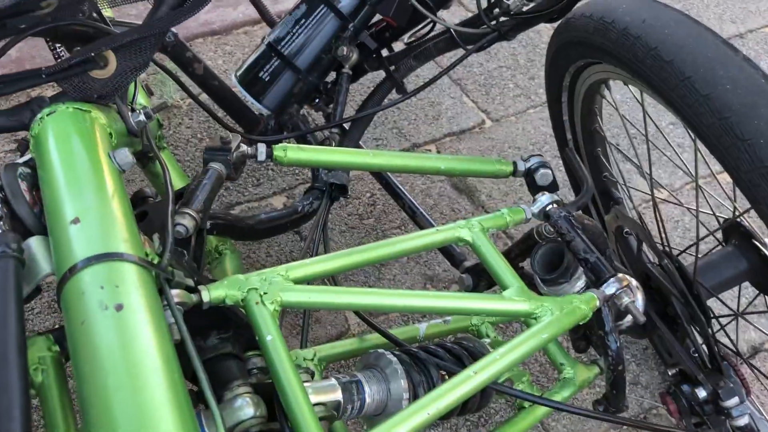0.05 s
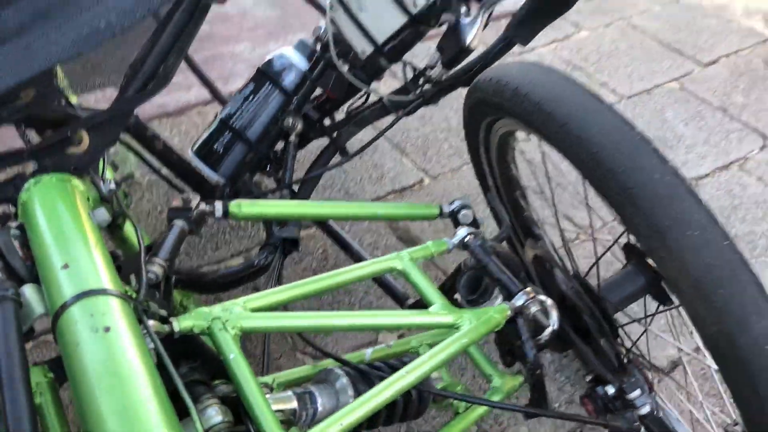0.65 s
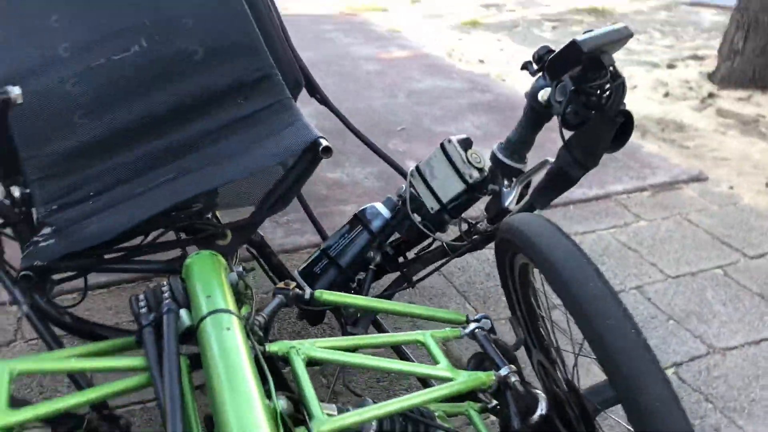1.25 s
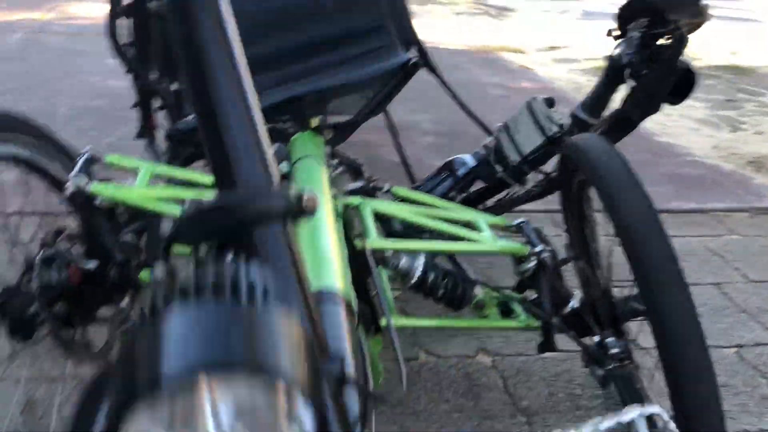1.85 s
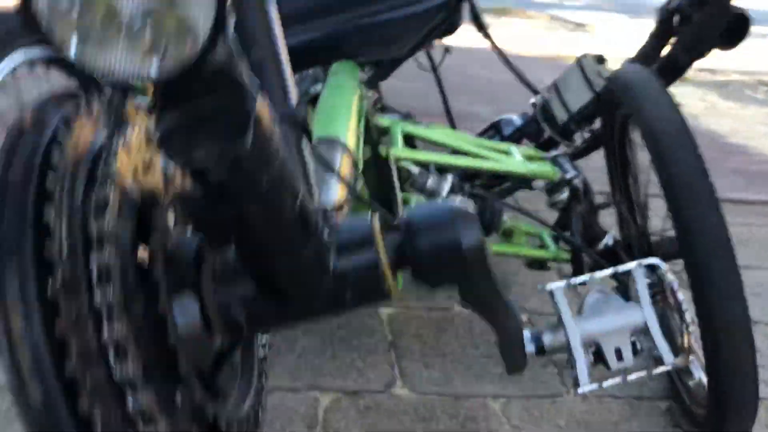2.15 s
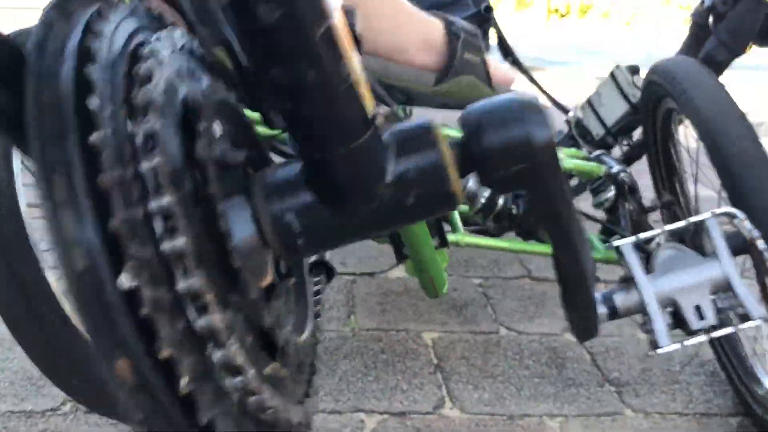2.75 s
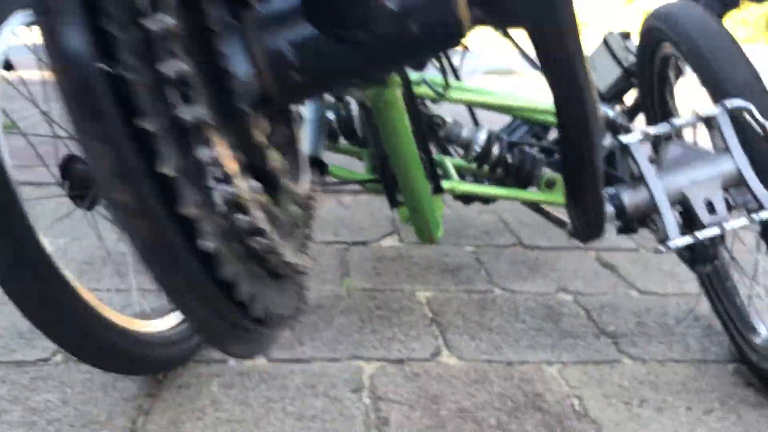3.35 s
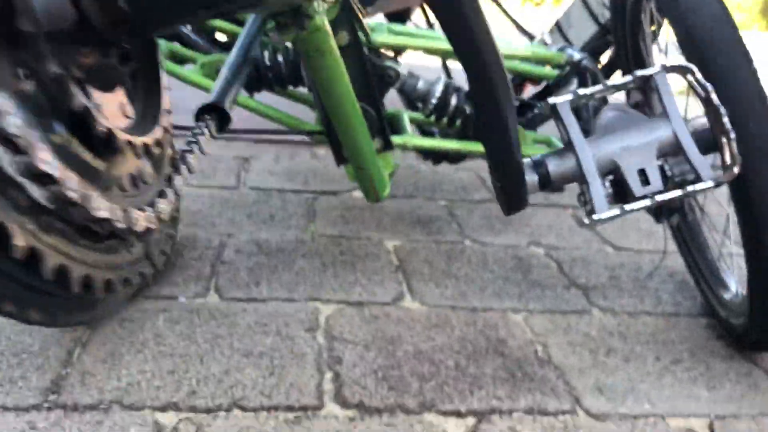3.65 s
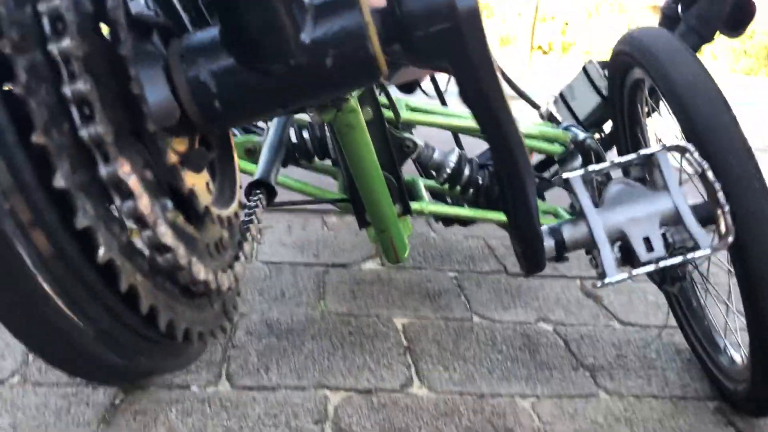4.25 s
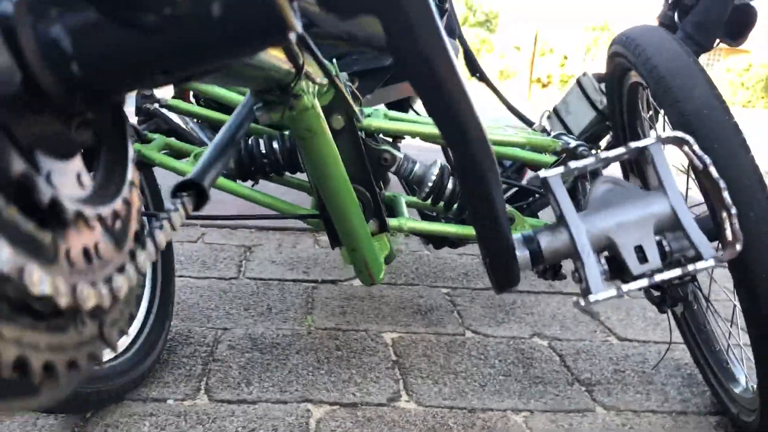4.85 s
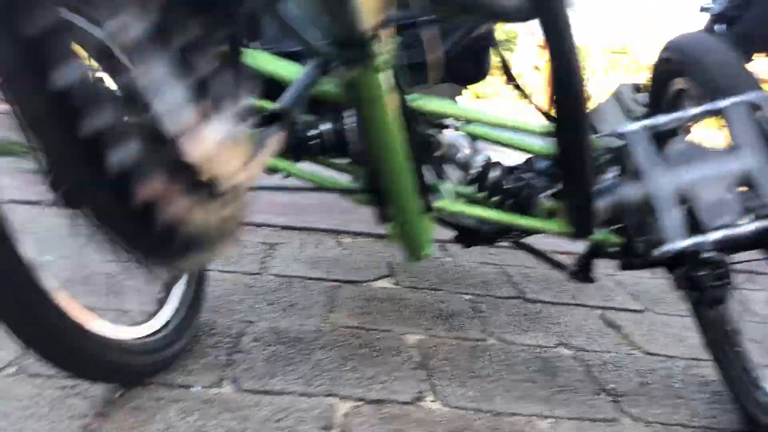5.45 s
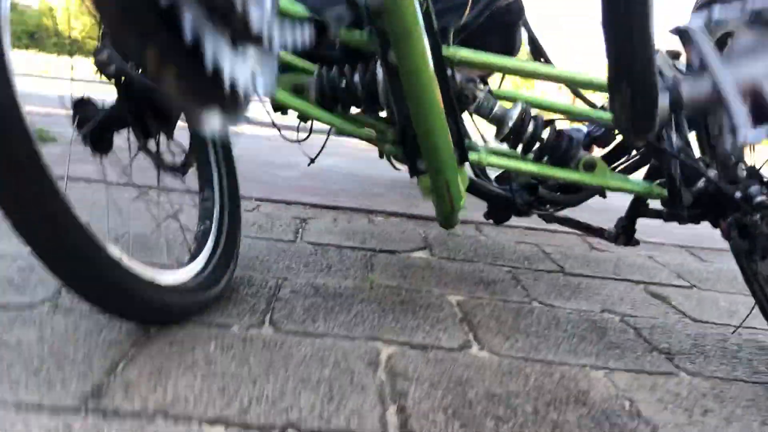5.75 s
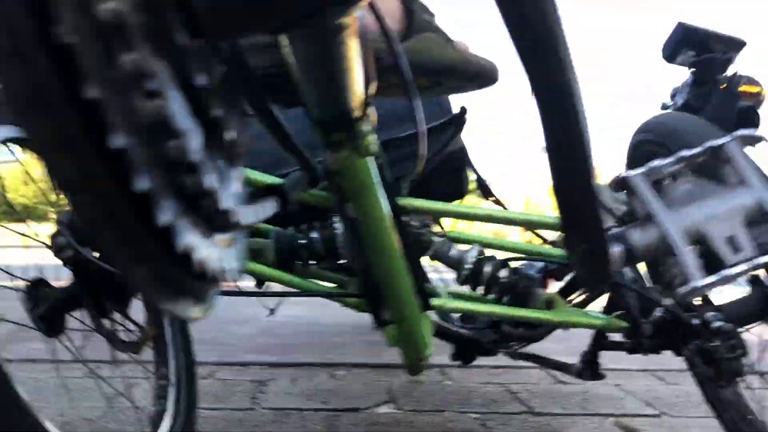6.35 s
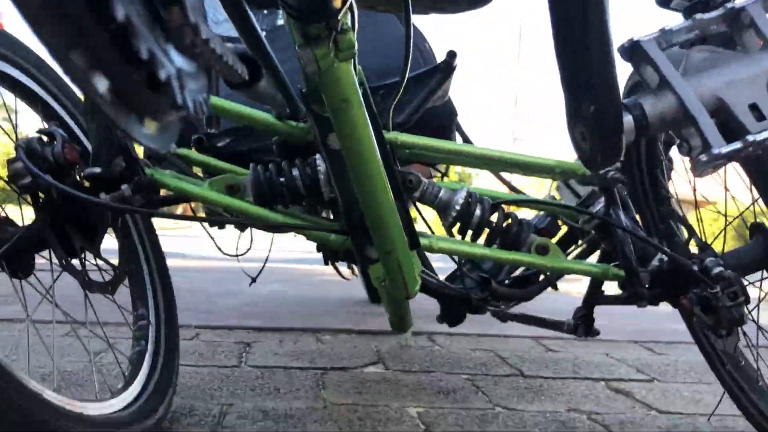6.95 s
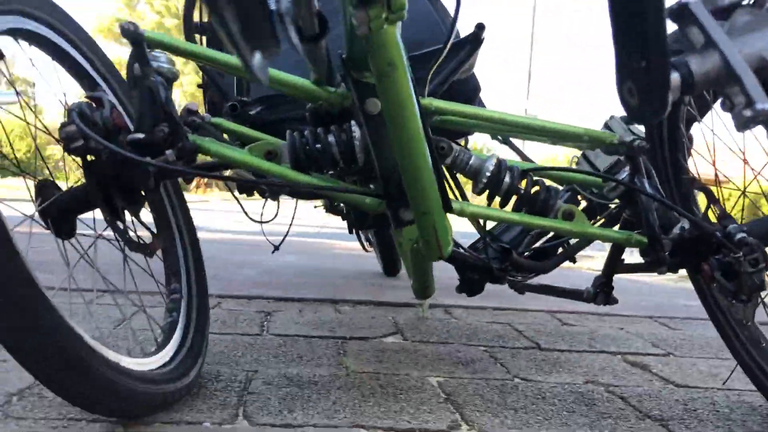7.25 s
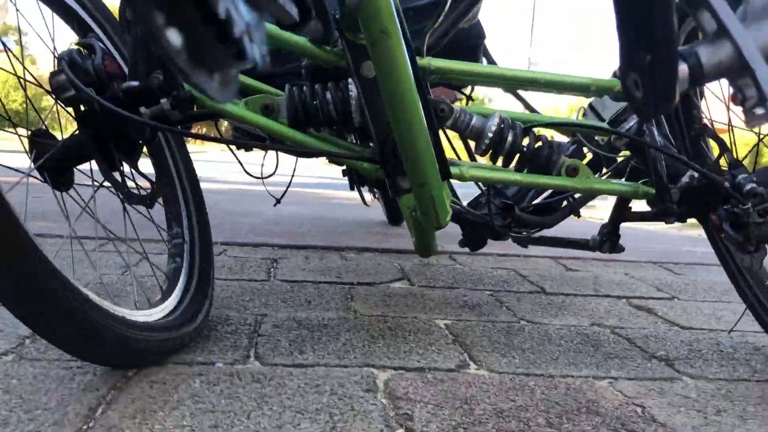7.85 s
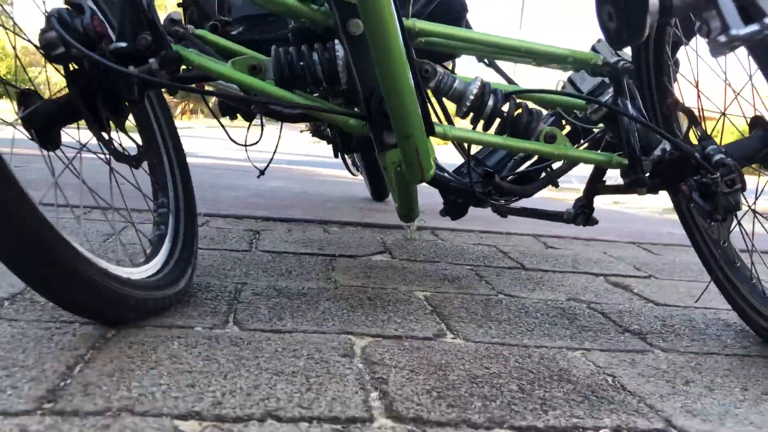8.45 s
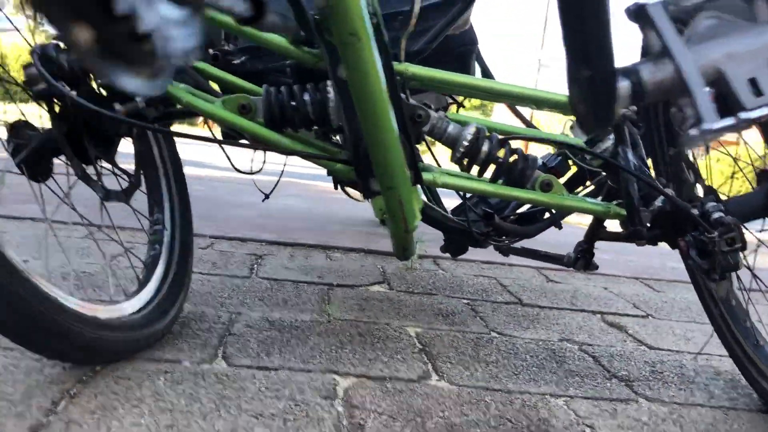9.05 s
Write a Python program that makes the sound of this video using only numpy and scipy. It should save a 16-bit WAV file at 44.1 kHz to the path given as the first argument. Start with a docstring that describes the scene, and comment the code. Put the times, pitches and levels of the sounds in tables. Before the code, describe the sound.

A faint low rumble of far traffic and a soft hiss run throughout, in a yard with little echo. Close by, a recumbent trike gives a few light ticks and a knock, then at about 0.8 seconds a metal part snaps sharply with a short, bright ring, the loudest sound. From 0.7 to 2.3 seconds shoes scuff lightly on gritty paving and clothes rustle softly. Between 2 and 2.7 seconds the frame knocks and thumps as someone settles into the seat, strongest near 2.3 and 2.7 seconds. From about 3 seconds the suspension is rocked: very short, dry creaks and tiny high squeaks come unevenly, mixed with light knocks, clicks of loose parts and faint ticking of chain and cables. The creaks stand out around 3.8 to 4.9 seconds and near 7.1. A dull knock comes near 7.8 seconds, and small ticks and squeaks continue until about 9 seconds.

```python
"""Far traffic rumbles faintly in a yard; a few ticks and knocks, then a metal part snaps and rings.
Soles scuff gritty paving as someone steps up to a recumbent trike and settles into the seat.
Each impact excites damped modes, so the frame knocks and thumps and its loose parts tick.
Then the suspension is rocked, and stick-slip friction in its dry joints makes short creaks
(runs of uneven slips) and squeaks (slips that lock into a pitch)."""
import sys
import numpy as np
from scipy import signal
from scipy.io import wavfile
from scipy.ndimage import uniform_filter1d

SR = 44100
rng = np.random.default_rng(int(sys.argv[2]) if len(sys.argv) > 2 else 0)


def store_wav(level_fs):
    """Save 16-bit WAV to argv[1]."""
    pcm = np.round(np.clip(np.atleast_2d(level_fs), -1, 1) * 32767)
    wavfile.write(sys.argv[1], SR, pcm.T.astype(np.int16))


N = 405940
BAND_LIMIT_HZ = 16200
HZ = np.fft.rfftfreq(2048, 1 / SR) + 1  # frequency axis of every spectrum


def amp(db):
    """Amplitude ratio of a level in decibels."""
    return 10 ** (np.asarray(db) / 20)


def unit_rms(x):
    """Normalisation to unit mean power."""
    return x / np.sqrt(np.mean(x ** 2) + 1e-20)


def seconds(length):
    """Uniform sampling times over a duration."""
    return np.arange(max(int(length * SR), 8)) / SR


def spectrum(points):
    """Spectral envelope in dB, interpolated over log frequency."""
    hz, db = np.transpose(points)
    return np.interp(np.log(HZ), np.log(hz), db)


def resonances(modes):
    """Resonance curves: one Lorentzian peak in dB for each mode."""
    return sum(db / (1 + (2 * (HZ - hz) / width) ** 2) for hz, width, db in modes)


def colour(x, db):
    """Minimum-phase filtering: a causal body rings after a blow, never before."""
    log_gain = np.log(amp(np.maximum(db - db.max(), -90)))
    log_response = np.conj(signal.hilbert(np.r_[log_gain, log_gain[-2:0:-1]]))
    return signal.fftconvolve(x, np.fft.ifft(np.exp(log_response)).real)


def levelled(x, db, span):
    """Equivalent level: x gets the energy of a steady sound of db lasting span seconds."""
    return amp(db) * x * np.sqrt(span * SR / (np.sum(x ** 2) + 1e-20))


def add(mix, start, sound):
    """Superposition: a sound joins the mix at a time in seconds."""
    part = mix[max(round(start * SR), 0):][:len(sound)]
    part += sound[:len(part)]


def mode(hz, t60, t, phase_turns=0):
    """Free vibration of a damped oscillator."""
    return np.exp(-np.log(1000) * t / t60) * np.sin(2 * np.pi * (hz * t + phase_turns))


def burst(t60, rise=.00028):
    """Modal overlap: many small modes merge into noise that spreads through a part and decays."""
    t = seconds(t60)
    return rng.standard_normal(len(t)) * (1 - np.exp(-t / rise)) * np.exp(-np.log(1000) * t / t60)


def grains(count, per_s, spread_db):
    """A Poisson process of tiny contacts, unequal in size."""
    occurs = rng.random(count) < per_s / SR
    size = np.minimum(rng.exponential(1, count), 4)
    return occurs * amp(spread_db * size) * rng.choice([-1, 1], count)


def contact_spot(count, low_hz=1700, high_hz=10000, width_hz=190, lift_db=5):
    """The point of excitation selects the modes: each contact favours a few notes of its own."""
    notes = low_hz * (high_hz / low_hz) ** rng.random(count)
    return resonances([(hz, width_hz, lift_db) for hz in notes])


def flexing(half_width_s=.048):
    """Suspension motion, 0-1: a Gaussian push builds and eases around each creak."""
    t = np.arange(0, N / SR, .005)
    pushes = sum(np.exp(-((t - start - length / 2) / half_width_s) ** 2)
                 for start, length, *_ in SLIP_RUNS)
    return np.interp(np.arange(N) / SR, t, np.tanh(pushes))


# Spectra of far traffic and of the yard's air: (frequency [Hz], relative level [dB])
TRAFFIC_SPECTRUM = [(22, -39), (32, -15), (48, -15), (72, 2), (110, -4), (180, -8), (260, -15),
                    (400, -20.5), (900, -54)]
AIR_SPECTRUM = [(120, -31), (200, 0), (283, -13.5), (709, -8), (1210, -10.5), (1740, -19), (2290, -15.5),
                (3020, -21.5), (9750, -34), (16000, -36.5)]
def traffic_and_air(traffic_db=-54.5, air_db=-63):
    """Incoherent distant sources sum to stationary noise: a low rumble and a faint hiss."""
    rumble = unit_rms(colour(rng.standard_normal(N), spectrum(TRAFFIC_SPECTRUM))[:N])
    air = unit_rms(colour(rng.standard_normal(N), spectrum(AIR_SPECTRUM))[:N])
    return amp(traffic_db) * rumble + amp(air_db) * air


# A faint, thin chirp: (time [s], duration [s], level [dB], centre frequency [Hz])
FAINT_CHIRPS = [(0.297, 0.28, -67.5, 3000)]
def chirps(half_width_octaves=.3):
    """Narrow-band noise has a vague pitch; here it swells and fades."""
    out = np.zeros(N)
    for start, length, db, hz in FAINT_CHIRPS:
        swell = np.hanning(len(seconds(length)))
        band = -20 * np.log10(1 + (np.log2(HZ / hz) / half_width_octaves) ** 2)
        add(out, start, levelled(colour(swell * rng.standard_normal(len(swell)), band), db, length))
    return out


# Movement of clothes and hands: (time [s], relative level [dB])
RUSTLE_ENVELOPE = [(0.0, -81), (0.72, -65), (0.86, -58), (1.0, -60.5), (1.08, -70.5), (1.55, -56),
                   (1.95, -67.5), (2.27, -55.5), (2.89, -68.5), (3.68, -60), (4.0, -73), (5.4, -63.5),
                   (6.9, -71), (7.899, -64.5), (8.8, -71), (9.2, -60.5)]
# Spectrum of rubbing cloth: (frequency [Hz], relative level [dB])
CLOTH_SPECTRUM = [(150, -12.5), (400, -1.5), (1100, 3.5), (2200, -3.5), (5000, -7.5), (9000, -12),
                  (15500, -18.5)]
def rustle(gain_db=-2, flex_db=3):
    """Cloth friction is shot noise: dense tiny contacts whose level follows the movement."""
    movement_db = np.interp(np.arange(N) / SR, *np.transpose(RUSTLE_ENVELOPE))
    rubbing = colour(grains(N, per_s=9000, spread_db=1.5), spectrum(CLOTH_SPECTRUM))[:N]
    return amp(movement_db + gain_db + flex_db * flexing()) * unit_rms(rubbing)


# Soles and tyres on paving: (time [s], duration [s], relative level [dB], treble tilt [dB/octave])
SCUFF_STROKES = [(0.727, 0.064, -57, 1), (0.802, 0.035, -47.5, -2.5), (0.952, 0.034, -51.5, -2),
                 (1.374, 0.039, -51.5, -3.5), (1.466, 0.14, -59.5, -2.5), (1.565, 0.092, -54.5, 1),
                 (1.978, 0.086, -61, 0.5), (2.125, 0.04, -53.5, 0), (2.266, 0.052, -48.5, -0.5),
                 (3.598, 0.114, -60, -8), (3.987, 0.052, -57.5, -6), (4.095, 0.059, -57.5, -6),
                 (5.764, 0.043, -51, -10), (8.917, 0.05, -52, -13.5)]
# Spectrum of crunching grit: (frequency [Hz], relative level [dB])
GRIT_SPECTRUM = [(150, 0.5), (400, -5.5), (1200, -8), (2000, -1), (4000, -5), (8000, -7.5), (15500, -13)]
def scuffs(gain_db=-1):
    """Granular friction: grit crunches under a stroke that presses harder and then lifts."""
    out = np.zeros(N)
    for start, length, db, tilt in SCUFF_STROKES:
        t = seconds(length)
        pressure = signal.windows.tukey(len(t), .4) * (.5 + t / length)
        grit = spectrum(GRIT_SPECTRUM) + tilt * np.log2(np.maximum(HZ, 1000))
        crunch = colour(pressure * grains(len(t), per_s=5000, spread_db=5), grit)
        add(out, start, levelled(crunch, db + gain_db, length))
    return out


def cables_and_chain(start_s=3.6, level_db=-65, flex_db=4, db_per_octave=-3, t60=.018, parts=14):
    """Random impacts, harder on each push, excite the impulse responses of many small parts."""
    contacts = grains(N, per_s=40, spread_db=2.2) * (np.arange(N) > start_s * SR)
    contacts *= amp(flex_db * flexing())
    struck = rng.integers(0, parts, N)
    body = spectrum(JOINT_SPECTRUM) + .7 * resonances(BUSHING_MODES) + db_per_octave * np.log2(HZ)
    out = np.zeros(N)
    for part in range(parts):
        response = unit_rms(colour(burst(t60, rise=.001), body + contact_spot(count=4)))
        out += signal.oaconvolve(contacts * (struck == part), response)[:N]
    return amp(level_db) * unit_rms(out)


# The seat under load: (time [s], duration [s], level [dB], fundamental [Hz])
SEAT_GROANS = [(7.510, .04, -50, 250)]
def seat_groans(overtone_db=-9):
    """Periodic vibration of the loaded seat: a fundamental and its second harmonic."""
    out = np.zeros(N)
    for start, length, db, hz in SEAT_GROANS:
        phase = 2 * np.pi * hz * seconds(length)
        tone = np.sin(phase) + amp(overtone_db) * np.sin(2 * phase)
        add(out, start, levelled(tone * np.hanning(len(tone)), db, length))
    return out


# Jolts to a bracket or the coil spring: (time [s], level [dB], frequency [Hz], t60 [s])
SPRING_PINGS = [(0.1099, -57, 2490, .06), (0.722, -49, 4080, .03), (4.418, -63, 5100, .3),
                (6.416, -62, 5100, .27)]
# Heavy knocks that shake the whole frame: (time [s], level [dB])
FRAME_THUMPS = [(2.028, -53), (2.275, -50), (2.325, -47), (2.684, -50), (7.765, -49.5)]
def pings_and_thumps(frame_hz=216, frame_t60=.028, span=.014):
    """A jolted part rings at its natural frequency: high for spring and brackets, low for the frame."""
    out = np.zeros(N)
    for start, db, hz, t60 in SPRING_PINGS:
        add(out, start, levelled(mode(hz, t60, seconds(t60)), db, span))
    for start, db in FRAME_THUMPS:
        add(out, start, levelled(mode(frame_hz, frame_t60, seconds(frame_t60)), db, span))
    return out


# The sharpest edge of a contact: (frequency [Hz], relative level [dB])
FIZZ_SPECTRUM = [(7000, -19.5), (11000, -5.5), (13000, -2), (15000, 0.5), (16300, -5.5)]
def fizz(db, t60=.018, span=.0029):
    """The briefest contacts reach the highest frequencies: grit spits in the top octave."""
    return levelled(colour(burst(t60), spectrum(FIZZ_SPECTRUM)), db, span)


# Spectrum of a hard contact: (frequency [Hz], relative level [dB])
TICK_SPECTRUM = [(1200, -24.5), (2500, -7.5), (4000, -4), (6000, 0.5), (8800, -2), (11000, -2), (15000, -9)]
def tick(db_per_octave, t60=.024, coupling=.36):
    """Mechanical coupling: a bright contact also stirs the modes of the bushing."""
    contact = spectrum(TICK_SPECTRUM) + db_per_octave * np.log2(np.maximum(HZ, 3000))
    bushing = coupling * resonances(BUSHING_MODES)
    return colour(burst(t60, rise=.0007), contact + bushing + contact_spot(count=4))


def hollow_blow(hz, t60=.036, hollow_db=4):
    """A broad resonance, falling away on both sides, centres a dull blow on one note."""
    treble_loss_db = 7.5 * np.log2(1 + (HZ / hz / 2.14) ** 3)
    bass_loss_db = 2 * np.log2(1 + (.13 * hz / HZ) ** 2)
    body = resonances([(hz, hz / 2, hollow_db)]) - treble_loss_db - bass_loss_db
    return colour(burst(t60, rise=.00073), body)


# Impacts of small loose parts: (time [s], tick level [dB], fizz level [dB])
LOOSE_IMPACTS = [(0.1093, -33, -49), (0.674, -38, -49), (0.7313, -38.5, -49), (1.6384, -43, -58),
                 (1.9752, -40, -61), (2.3133, -31, -41), (2.708, -31, -43), (2.8898, -41.5, -67),
                 (4.1676, -47.5, -58), (4.3538, -38, -61), (4.5448, -42, -58), (4.567, -40, -52),
                 (4.721, -36.5, -56), (5.1672, -42, -55), (5.2256, -42.5, -63), (5.6649, -39.5, -59),
                 (5.818, -35, -53), (6.4158, -41.5, -59), (6.5033, -35.5, -52), (6.577, -45, -67),
                 (7.061, -34.5, -54), (7.3026, -40.5, -69), (7.5619, -41.5, -63), (7.6006, -39, -61),
                 (7.8293, -35.5, -54), (7.864, -38.5, -61), (7.8774, -38, -61), (8.3694, -38.5, -60),
                 (8.4022, -41.5, -67), (8.4612, -40, -50), (8.8272, -44.5, -74)]
def loose_parts(body_hz=1900, body_db=-6, span=.00045):
    """A light impact gives a bright tick and the weak, high resonance of a small body."""
    out = np.zeros(N)
    for start, db, fizz_db in LOOSE_IMPACTS:
        add(out, start, levelled(tick(db_per_octave=-4), db, span))
        add(out, start, levelled(hollow_blow(body_hz), db + body_db, span))
        add(out, start, fizz(fizz_db))
    return out


# The frame takes weight: (time [s], blow level [dB], note [Hz], tick level [dB], fizz level [dB])
FRAME_IMPACTS = [(0.704, -31, 2160, -30.5, -48), (0.982, -41.5, 1105, -48, -61),
                 (1.399, -43, 800, -48.5, -61.5), (1.499, -43, 1900, -62, -72),
                 (1.822, -48, 2200, -67, -78), (1.969, -35, 600, -49, -60), (2.028, -37, 650, -55, -68),
                 (2.086, -37, 1940, -54, -58), (2.101, -40.5, 850, -58, -65), (2.158, -37, 940, -51, -54),
                 (2.198, -41, 650, -68, -75), (2.274, -30.5, 850, -54, -59),
                 (2.3273, -25.5, 1640, -40, -43), (2.366, -36, 2230, -47, -60),
                 (2.6835, -23, 1330, -45, -57), (2.696, -31, 1400, -39, -49),
                 (2.98, -43, 850, -67.5, -80.5), (3.412, -46, 1660, -66, -77.5),
                 (3.608, -36, 970, -58, -76), (3.63, -36.5, 770, -49, -62), (3.672, -35.5, 800, -52.5, -64),
                 (4.256, -41, 950, -60, -77), (4.366, -39, 1010, -54, -69), (4.4185, -36.5, 2090, -39, -39),
                 (4.707, -41.5, 1700, -57, -66), (4.975, -37.5, 650, -53, -68),
                 (5.243, -40, 2300, -54, -69.5), (5.454, -40, 960, -57, -73.5),
                 (6.229, -38, 1153, -44, -56), (6.283, -39, 697, -53, -65), (6.488, -40, 1960, -58, -68),
                 (6.96, -41.5, 2300, -47, -62), (7.18, -38, 1940, -58, -74), (7.338, -38, 652, -72, -79),
                 (7.764, -32, 760, -53.5, -63.5)]
def frame_knocks(span=.00072, tick_span=.0024, note_t60=.024, note_db=-3, note_db_per_octave=7):
    """Impact excitation: the frame resonates under each contact, more clearly the higher its note."""
    out = np.zeros(N)
    for start, db, hz, tick_db, fizz_db in FRAME_IMPACTS:
        ring_db = note_db + note_db_per_octave * np.log2(hz / 1800)
        add(out, start, levelled(hollow_blow(hz), db, span))
        add(out, start, levelled(mode(hz, note_t60, seconds(note_t60)), db + ring_db, span))
        add(out, start, levelled(tick(db_per_octave=-5), tick_db, tick_span))
        add(out, start, fizz(fizz_db))
    return out


# Metal strikes metal and rebounds: (time [s], crack level [dB], crack t60 [s])
SNAP_CONTACTS = [(0.8375, -20.5, 0.0077), (0.8403, -26.5, 0.026), (0.8444, -35.5, 0.032),
                 (0.85, -31.5, 0.025)]
# Modes of the steel part: (frequency [Hz], relative level [dB], t60 when free [s])
STEEL_MODES = [(1331, -19, .07), (2720, -17, .06), (3192, -17, .05), (4922, -5, .07), (5310, -3, .06),
               (5570, 1, .05), (6258, 1, .055), (6598, -7, .05), (6750, -5, .05), (7150, -7, .045),
               (7900, -4, .045), (8408, -7, .05), (8657, -3, .05), (9185, -6, .045), (9320, -6, .045),
               (11326, -3, .04), (15230, -4, .04)]
# Contact noise of the snap: (frequency [Hz], relative level [dB])
CRACK_SPECTRUM = [(250, -17), (600, -18.5), (1100, -18.5), (2400, -15), (3300, -8.5), (4400, -4.5),
                  (5600, -3.5), (8500, -1.5), (13000, -5), (15300, -3), (16300, -10.5)]
def metal_snap(ring_db=-3, t60_ratio=.5, span=.009):
    """Each impact cracks and rings the steel; contact damping by adjoining parts shortens the ring."""
    out = np.zeros(N)
    ring = sum(amp(db) * mode(hz, t60 * t60_ratio, seconds(.15), rng.random())
               for hz, db, t60 in STEEL_MODES)
    for start, db, t60 in SNAP_CONTACTS:
        crack = colour(burst(t60, rise=.0001), spectrum(CRACK_SPECTRUM))
        add(out, start, levelled(ring, db + ring_db, span))
        add(out, start, levelled(crack, db, span))
    return out


# Slips fast enough to sing:
# (time [s], duration [s], level [dB], pitch [Hz], glide [octaves], roughness [0-1])
SINGING_SLIPS = [(3.062, 0.051, -51.5, 2940, 0.073, 0.9), (4.689, 0.025, -59, 2900, 0.037, 0.5),
                 (5.415, 0.021, -54.5, 1634, 0.12, 0.04), (5.428, .018, -55, 1985, 0.048, 0),
                 (6.035, .022, -58.5, 1804, 0.073, 0.5), (6.614, 0.024, -51, 2400, -0.082, 0.32),
                 (6.676, .028, -49.5, 2810, 0.056, 0.37), (7.214, 0.013, -45, 1932, -0.13, 0.7),
                 (8.0157, 0.007, -45.5, 2990, 0.04, 0.34), (8.019, .007, -46, 2375, -0.14, 0.2),
                 (8.138, 0.015, -57.5, 2943, -0.017, 0), (8.563, 0.02, -48, 1940, -0.022, 0.6),
                 (9.102, 0.013, -43, 1603, -0.084, 0.25)]
def squeaks(waver=.018, rough_fizz_db=5):
    """Self-excited oscillation: periodic slips drive the bushing with a gliding harmonic series."""
    out = np.zeros(N)
    for start, length, db, hz, glide, rough in SINGING_SLIPS:
        t = seconds(length)
        drift, rasp = rng.standard_normal((2, len(t)))
        wobble = 1 + waver * np.sqrt(rough) * unit_rms(uniform_filter1d(drift, size=40))
        pitch = hz * 2 ** (glide * (t / length - .5)) * wobble
        turns = np.cumsum(pitch) / SR
        harmonics = sum(np.cos(2 * np.pi * (k * turns + rng.random()))
                        for k in range(1, int(BAND_LIMIT_HZ / hz) + 1))
        drive = np.sqrt(1 - rough) * unit_rms(harmonics) + np.sqrt(rough) * rasp
        drive *= signal.windows.tukey(len(t), .15)
        top_octave = spectrum([(8800, 0), (13000, rough_fizz_db * rough)])
        body = spectrum(JOINT_SPECTRUM) + resonances(BUSHING_MODES) + top_octave
        add(out, start, levelled(colour(drive, body), db, length))
    return out


def slip_train(length, per_s, swell_db, jitter=.08, glide_octaves=.4, uneven_db=3, t60=.02, alike=.5):
    """Relaxation oscillation: a joint sticks and slips unevenly, its slips ringing partly alike."""
    timing, sizes = rng.standard_normal((2, 64))
    progress = np.minimum(np.arange(1, len(timing)) / (per_s * length), 1)
    glide = 2 ** (glide_octaves * timing[0] * (progress - .5))  # the run speeds up or slows down
    gaps = np.exp(jitter * timing[1:]) / (per_s * glide)
    onsets = np.r_[0, np.cumsum(gaps)]
    slips = np.zeros(len(seconds(length + t60)))
    common_ring = burst(t60)
    for onset, size in zip(onsets[onsets < length], sizes):
        ring = np.sqrt(alike) * common_ring + np.sqrt(1 - alike) * burst(t60)
        add(slips, onset, amp(swell_db * onset / length + uneven_db * size) * ring)
    return slips


# Broad spectrum of the dry joints: (frequency [Hz], relative level [dB])
JOINT_SPECTRUM = [(300, 1), (1000, 2), (2000, 1.5), (5000, 3), (8800, 0), (10000, -5), (13000, -10),
                  (15500, -13)]
# Resonances of the pivot and of the bushing: (frequency [Hz], width [Hz], gain [dB])
PIVOT_MODES = [(3146, 170, 11.5), (4100, 200, 7), (6250, 160, 6.5), (7200, 1100, 15), (8200, 180, 8),
               (8800, 600, 14.5), (11160, 750, 8.5), (12900, 380, -7)]
BUSHING_MODES = [(1900, 510, 5.6), (2900, 140, 4.7), (4820, 180, 5.2), (5760, 280, 6.2), (6640, 240, 2.5),
                 (8700, 320, 9.8), (14700, 460, 7.9)]
# A joint lets go: (time [s], duration [s], level [dB], pivot share [0-1], relative fizz [dB])
SLIP_RUNS = [(3.729, 0.005, -50, .8, 9), (3.758, 0.011, -38, 0.95, 5), (3.887, .054, -45.5, 0.97, 2),
             (4.045, .004, -42.5, 0.84, -3), (4.069, .004, -39, 1, 3), (4.392, 0.033, -53.5, 0.42, 1),
             (4.678, .053, -53, 0.37, 7), (4.758, .008, -40, 1, 5), (4.856, 0.039, -50.5, 0.2, 2),
             (4.906, .036, -44.5, .77, -1), (5.321, 0.032, -54, .12, 7), (5.717, .015, -57.5, .2, 2),
             (5.78, 0.041, -50, 0.24, 9), (5.916, 0.028, -58.5, .05, 7), (6.254, .018, -53, 0.57, 2),
             (6.459, .01, -50, .86, 4), (6.616, 0.041, -49.5, 0.24, -2), (6.663, 0.0337, -50, 0, -8),
             (7.089, 0.027, -48, 0.52, 11), (7.118, .022, -41.5, .67, 7), (7.231, 0.039, -53.5, 0.07, 1),
             (7.434, 0.037, -53, 1, 0), (7.505, 0.037, -57, .05, 20), (7.641, 0.02, -48.5, .66, -2),
             (7.906, 0.031, -50, .3, 8), (8.091, 0.023, -52.5, 0.23, -4), (8.124, .027, -51.5, 0.6, -10),
             (8.446, .034, -58, .05, -7), (8.641, .022, -63, 0.23, 4), (8.946, .022, -48.5, 0.29, 8),
             (8.977, 0.033, -48, 0.55, 0)]
def creaks(pivot_per_s=250, bushing_per_s=480, pivot_swell_db=-6.5, bushing_swell_db=.5):
    """Stick-slip friction: the pivot slips slowly and dies away; the bushing slips fast and holds on."""
    out = np.zeros(N)
    for start, length, db, share, fizz_db in SLIP_RUNS:
        per_s = share * pivot_per_s + (1 - share) * bushing_per_s
        swell_db = share * pivot_swell_db + (1 - share) * bushing_swell_db
        slips = slip_train(length, per_s, swell_db)
        modes = share * resonances(PIVOT_MODES) + (1 - share) * resonances(BUSHING_MODES)
        top_octave = spectrum([(8800, .17), (9800, -.68), (12000, fizz_db + 1.5)])
        body = spectrum(JOINT_SPECTRUM) + modes + top_octave + contact_spot(count=7)
        add(out, start, levelled(colour(slips, body), db, length))
    return out


def yard_reflections(direct, near_db=-12, near_t60=.066, far_db=-25, far_t60=.2):
    """Early reflections from paving and frame, and a faint, duller tail, join the direct sound."""
    out = direct.copy()
    for delay, db, t60, treble_loss_db in [(.004, near_db, near_t60, 5), (.018, far_db, far_t60, 13)]:
        echo = colour(burst(t60), -treble_loss_db * HZ / BAND_LIMIT_HZ)
        add(out, delay, amp(db) * signal.oaconvolve(direct, echo / np.linalg.norm(echo)))
    return out


def scene():
    """Superposition of the near sources, their reflections and the background."""
    impacts = metal_snap() + frame_knocks() + loose_parts() + pings_and_thumps()
    friction = creaks() + squeaks() + scuffs() + seat_groans()
    near = impacts + friction + chirps() + cables_and_chain()
    return (yard_reflections(near) + traffic_and_air() + rustle())[None]


def record(dry, low_hz=32, ceiling=.62):
    """The microphone as a transducer: bass roll-off, soft saturation and a limited bandwidth."""
    thinned = signal.sosfilt(signal.butter(2, low_hz, "highpass", fs=SR, output="sos"), dry)
    rounded = ceiling * np.tanh(thinned / ceiling)
    lowpass = signal.firwin(255, BAND_LIMIT_HZ, window=("kaiser", 8), fs=SR)
    return signal.oaconvolve(rounded, lowpass[None], "same")


dry = scene()
out = record(dry)
store_wav(out)
```